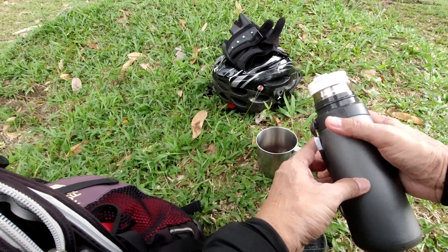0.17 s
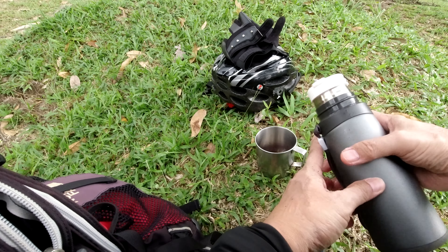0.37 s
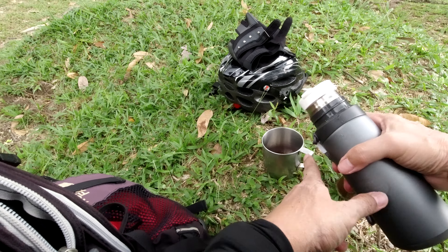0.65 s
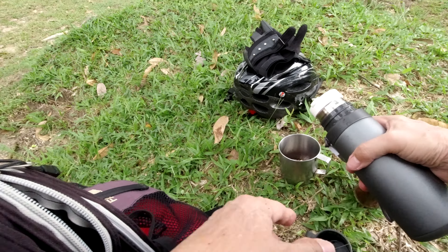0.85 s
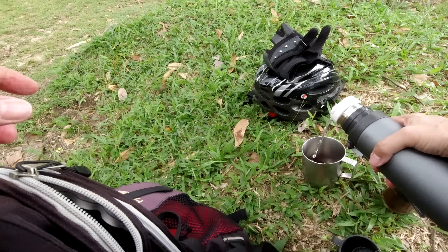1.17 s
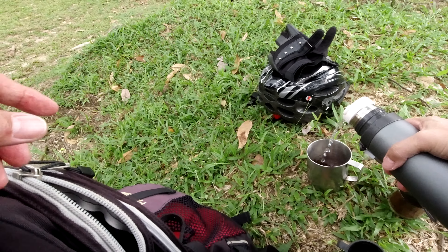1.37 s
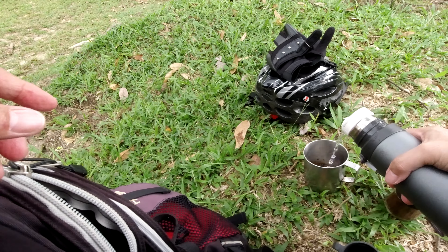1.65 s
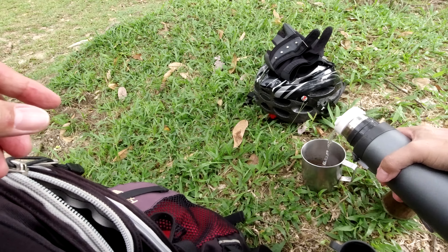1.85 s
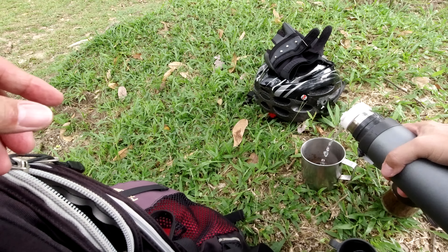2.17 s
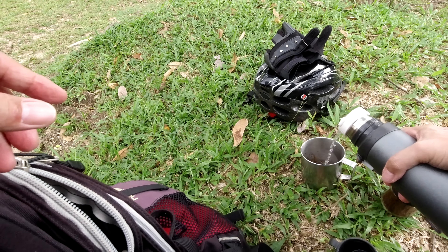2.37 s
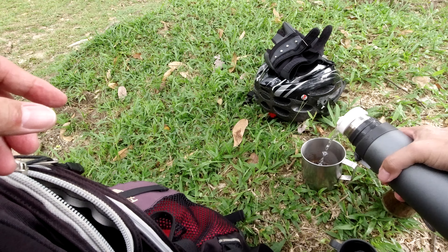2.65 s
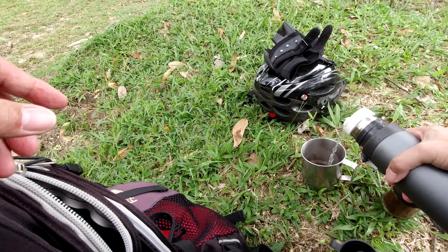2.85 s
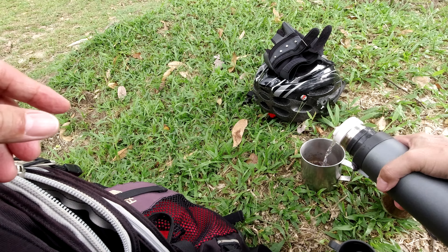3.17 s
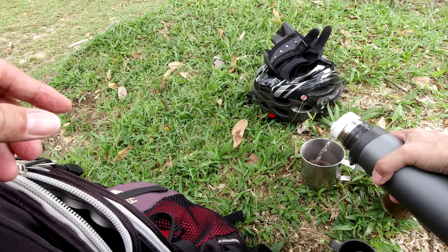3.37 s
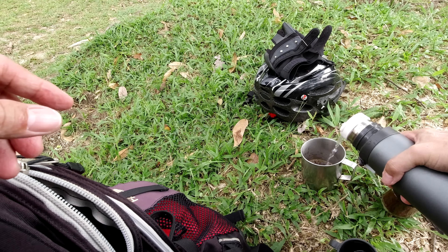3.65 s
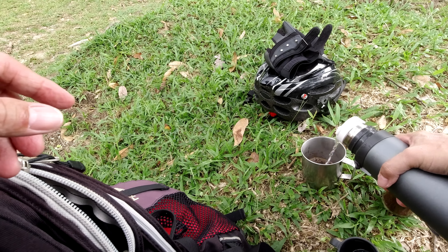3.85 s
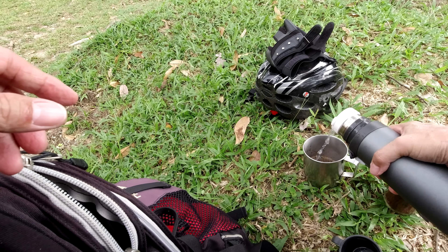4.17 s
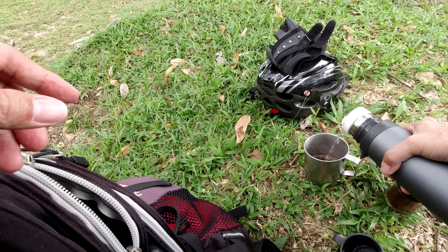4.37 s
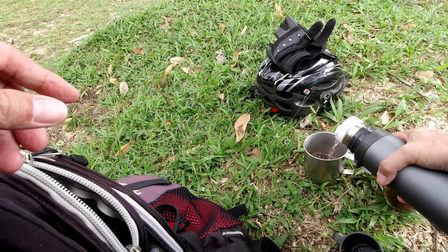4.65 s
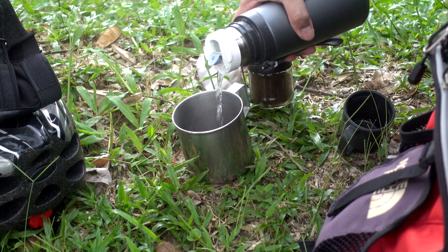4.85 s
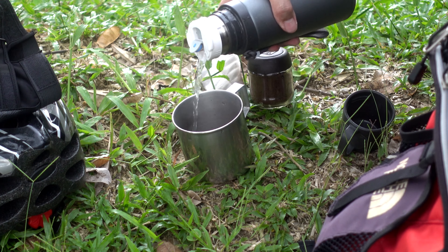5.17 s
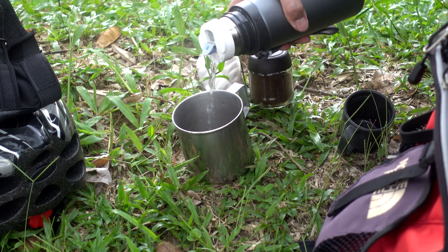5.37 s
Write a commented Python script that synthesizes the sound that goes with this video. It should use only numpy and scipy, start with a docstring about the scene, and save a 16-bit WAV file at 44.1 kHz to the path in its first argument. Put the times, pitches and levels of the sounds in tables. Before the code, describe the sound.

Outdoors amid shrill, constant insects, water pours lightly into a metal mug with bubbly plinks, crisp droplet ticks and brief faint chirps.

```python
"""Insects drone high and steadily all around over soft air; two light ticks and faint far notes come first.
A thin stream of water then runs from a flask into a steel mug standing on grass.
Trapped bubbles plink and gulp as damped rising tones; droplets tick as short rings and noise splats.
Impacts and heavy beads ring the mug's moving resonances, which sway and fall as it fills.
A thin whistle and a hoarse hiss rise as faint chirps; a last hiss sweeps down."""
import sys
import numpy as np
from scipy import signal
from scipy.fft import rfft, irfft
from scipy.io import wavfile

SR = 44100
rng = np.random.default_rng(int(sys.argv[2]) if len(sys.argv) > 2 else 0)


def waveform_to_disk(signal):
    """Save audio, clipped to [-1, 1], as 16-bit WAV at the path in sys.argv[1]."""
    frames = np.transpose(np.atleast_2d(signal))
    scaled = np.clip(frames, -1, 1) * 32767
    samples = np.round(scaled).astype(np.int16)
    wavfile.write(sys.argv[1], SR, samples)


N = 242991
TIME = np.arange(N) / SR

# largest bubbles trapped by the stream: start_s, relative level_db, pitch_hz, cycles to -60 dB
BUBBLE_EVENTS = [(1.4116, -41.5, 2690, 38), (1.6593, -31.0, 2420, 16.0), (1.8682, -49, 1000, 7),
                 (1.9179, -46.5, 1020, 9), (2.1187, -43.5, 1716, 32), (2.3285, -44, 880, 15),
                 (2.6786, -48, 1490, 29.0), (2.7523, -44.5, 1640, 10), (2.8394, -41, 1600, 6),
                 (2.9946, -48, 1350, 15.0), (3.0165, -42.5, 960, 8.5), (3.152, -42.0, 2840, 9),
                 (3.3643, -41, 945, 23), (3.5702, -43, 1482, 28), (3.6438, -38.5, 2790, 25),
                 (3.6873, -48, 1390, 15), (3.7192, -35.5, 860, 14), (3.7992, -42, 875.0, 29.0),
                 (3.8118, -40.5, 2300, 18), (3.8436, -40, 2360, 26), (3.8881, -38, 2590, 15),
                 (3.9451, -46.5, 1280, 18), (3.9631, -36.0, 834, 29.5), (4.0233, -38.5, 2715.0, 35),
                 (4.0249, -46.0, 930, 14), (4.0614, -40, 2685.0, 15), (4.0996, -39.5, 883, 31),
                 (4.1016, -50, 1400, 17.0), (4.2707, -46.5, 905, 18), (4.3032, -37, 891, 17.5),
                 (4.3164, -43, 800, 16.0), (4.3478, -41, 767, 22), (4.4235, -42, 743, 10.5),
                 (4.4799, -41, 870, 9.5), (4.4892, -46, 2285.0, 28), (4.5175, -45.5, 2925.0, 21),
                 (4.5495, -38.5, 1270, 7.5), (4.5611, -45.5, 2850, 45.0), (4.6178, -36.5, 874, 11),
                 (4.6532, -34, 2900, 19), (4.6837, -43, 955.0, 13), (4.8865, -38.5, 2720, 21),
                 (5.0703, -36, 836, 10), (5.1077, -42, 743, 17.5), (5.1531, -46.5, 2820, 43),
                 (5.2269, -40.0, 950, 19), (5.2756, -42.5, 2850, 32.0), (5.2884, -43.5, 2780, 24.0),
                 (5.3405, -43.0, 900, 11.0), (5.4378, -36, 3400, 3), (5.4718, -43, 2800, 20)]
# modes across the mug, set by its bore: pitch_hz, width_hz, relative level_db
BORE_RESONANCES = [(2216, 230, 1.5), (2810, 85, -1)]


def amp(db):
    """Decibels to gain."""
    return 10 ** (np.asarray(db) / 20)


def unit(x):
    """Scales to rms 1."""
    return x / np.sqrt(np.mean(x ** 2) + 1e-20)


def read(points, hz):
    """Reads a spectrum table on a log-frequency axis."""
    f, value = np.transpose(points)
    return np.interp(np.log(hz + 1), np.log(f), value)


def add(mix, s, sound):
    """Mixes a sound in at time s."""
    part = mix[..., round(s * SR):][..., :sound.shape[-1]]
    part += sound[..., :part.shape[-1]]


def high_pass(x, hz, order):
    """Removes the bass below hz."""
    return signal.sosfilt(signal.butter(order, hz, "high", fs=SR, output="sos"), x)


def drift(rate_hz):
    """Smooth random motion of rms 1: noise rolled off above rate_hz."""
    hz = np.fft.rfftfreq(N, 1 / SR)
    return unit(irfft(rfft(rng.standard_normal(N)) / (1 + (hz / rate_hz) ** 2), N))


def resonate(x, hz, width_hz):
    """A resonance of gain 1 whose centre may move: shift to 0 Hz, low-pass, shift back."""
    turn = np.exp(2j * np.pi * np.cumsum(hz * np.ones(N)) / SR)
    r = np.exp(-np.pi * width_hz / SR)
    envelope = signal.lfilter([1 - r], [1, -r], x / turn + 1e-18)
    return 2 * (turn * envelope).real


def ring(hz, t60_s, glide=0., build_cycles=0.36, bend=1):
    """A damped tone of peak-1 envelope, rising by share glide over t60; bend > 1 holds, then drops faster."""
    t = np.arange(int(1.3 * t60_s * SR) + 16) / SR
    shape = (1 - np.exp(-t * hz / build_cycles)) * amp(-60 * (t / t60_s) ** bend)
    return shape / shape.max() * np.sin(2 * np.pi * hz * (t + glide * t ** 2 / (2 * t60_s)))


def walls(x, wet_db, t60_s):
    """Steel walls scatter a sound for a few milliseconds, differently towards each ear."""
    t = np.arange(1024) / SR
    tail = rng.standard_normal((2, len(t))) * amp(-60 * t / t60_s) * (t > .0004)
    tail /= np.linalg.norm(tail, axis=1, keepdims=True)
    return x + amp(wet_db) * signal.oaconvolve(x[None], tail, axes=1)[:, :N]


def diffuse(colour_db):
    """Noise from all around, whose likeness in the two ears depends on frequency."""
    # hz, left-right coherence
    coherence = [(60, 0.9), (130, 1), (290, 0.46), (640, 0.49), (1300, -0.41), (2400, 0.5), (4400, -0.42),
                 (8000, -0.17), (15000, 0.25)]
    same = np.clip(read(coherence, np.fft.rfftfreq(N, 1 / SR)), -1, 1)
    left, other = rfft(rng.standard_normal((2, N)))
    right = same * left + np.sqrt(1 - same ** 2) * other
    return unit(irfft(np.array([left, right]) * amp(colour_db), N))


def soft_air():
    """Outdoor air: diffuse coloured noise with slight slow swells."""
    # hz, relative density_db (per Hz)
    air_spectrum = [(20, -37), (45, -25), (80, -16.5), (150, -15), (300, -6), (590, -3), (665, 7.5),
                    (760, 0.5), (1100, 3), (1380, 6), (1620, 4.5), (2150, 8), (3200, 3), (4100, 1.5),
                    (5100, 9), (5900, 1), (9400, -3.5), (16000, 3)]
    noise = diffuse(read(air_spectrum, np.fft.rfftfreq(N, 1 / SR)))
    return amp(-55.0) * noise * amp(.5 * drift(rate_hz=9.6))


def shimmer(depth_db):
    """The quick flicker of many insects buzzing out of step."""
    return amp(depth_db * unit(high_pass(drift(rate_hz=140), hz=4.3, order=2)))


def insects():
    """Two far choruses, split at 9.4 kHz: steady diffuse noise bands, each with its own shimmer."""
    # insect drone: hz, relative density_db (per Hz)
    drone_spectrum = [(5500, -67), (6450, -20), (7100, -8), (7820, 1.5), (8450, -4.5), (8850, -25),
                      (9500, -29.5), (10800, -13.5), (11900, -22), (13300, -19.5), (14150, -10),
                      (14800, -9.5), (15700, -7.5)]
    # narrow bands in the drone: centre_hz, width_hz, rise_db
    shrill_bands = [(7885, 90, 1.2), (13510, 50, 3.5), (14150, 50, 3), (14838, 30, 6), (15200, 50, 2),
                    (15700, 40, 3)]
    hz = np.fft.rfftfreq(N, 1 / SR)
    shrill_db = sum(db * np.exp(-((hz - f) / width) ** 2) for f, width, db in shrill_bands)
    drone = amp(-43.5) * diffuse(read(drone_spectrum, hz) + shrill_db)
    lower = irfft(rfft(drone) * (hz < 9400), N)
    chorus = lower * shimmer(depth_db=1.6) + (drone - lower) * shimmer(depth_db=1.37)
    # a little stronger on the left: hz, left-right difference in dB
    lean_db = read([(6500, 0.6), (8200, 1.9), (10000, 1.2), (14000, 0.17)], hz)
    return irfft(rfft(chorus) * amp([lean_db / 2, -lean_db / 2]), N)


def stopper():
    """Light ticks, perhaps the flask's stopper as the hand shifts, ring its hard plastic."""
    # start_s, relative level_db
    tick_events = [(0.006, -43), (0.015, -43)]
    # pitch_hz, relative level_db, t60_s
    stopper_modes = [(2570, -12, 0.043), (3270, -1.5, 0.023), (5800, -5, 0.023), (6560, 4.5, 0.0068)]
    hits = np.zeros(N)
    for s, db in tick_events:
        add(hits, s, amp([db]))
    body = sum(amp(db) * signal.oaconvolve(hits, ring(hz, t60_s))[:N] for hz, db, t60_s in stopper_modes)
    return walls(body, wet_db=-10, t60_s=0.012)


def far_calls():
    """Faint, slightly rising notes, perhaps a distant bird, blurred by the way: narrow noise bands."""
    # middle_s, pitch_hz, level_db (rms before fading), length_s, width_hz
    calls = [(0.23, 3160, -64.5, 0.2, 700), (0.323, 2213, -64, 0.15, 100), (0.74, 3100, -68, 0.1, 398),
             (1.126, 2250, -65.5, 0.24, 180)]
    rise_hz_per_s = 800
    out = np.zeros(N)
    for s, hz, db, length_s, width_hz in calls:
        pitch_hz = hz + rise_hz_per_s * np.clip(TIME - s, -length_s, length_s)
        band = resonate(rng.standard_normal(N), pitch_hz, width_hz)
        note = unit(resonate(band, pitch_hz, width_hz))
        out += amp(db) * note * np.exp(-(2 * (TIME - s) / length_s) ** 2)
    return out


def stream():
    """The stream's strength, mug and spray gains at every sample."""
    # start_s, strength_db, mug_db (drive that rings the mug), spray_db
    stream_points = [(1.3, -9, -43, 3), (1.82, -6, -2.5, -5), (2.02, -8.5, -4.5, -21),
                     (2.46, -1.5, -9.5, -5), (2.52, -5.5, 9, -4), (2.62, -8, 1, 5), (2.88, 1, -5.5, -2.5),
                     (3.08, 2, -11.5, -5), (3.35, -3, -2.5, -2), (3.53, 3, -18.5, -13), (3.58, 2.5, -4, -6),
                     (3.75, 0, 0.5, -5), (4.05, -1, 2.5, 6.5), (4.4, 1, -2, -12), (4.85, 0.5, -5, -0.5),
                     (5.1, -1.5, 0.5, -10), (5.5, 5, -22, -7.5)]
    s, strength_db, mug_db, spray_db = np.transpose(stream_points)
    strength = amp(np.interp(TIME, s, strength_db)) * (TIME > s[0])
    return strength, amp(np.interp(TIME, s, mug_db)), amp(np.interp(TIME, s, spray_db))


def impacts(per_s, spread_db):
    """Random impulses of either sign with exponentially spread levels, rms 1 in all."""
    size = amp(spread_db * np.minimum(rng.exponential(1, N), 3))
    return unit(size * rng.choice([-1, 1], N) * (rng.random(N) < per_s / SR))


def mug_modes():
    """The mug's two lowest resonances: (Hz at every sample, width Hz, struck dB, trickle dB)."""
    # lower, then upper: width_hz, struck_db, trickle_db
    mode_settings = [(24.3, -1, 1), (43.4, -5, -7.5)]
    # pitches fall as the mug fills and sway as water sloshes: time_s, lower_hz, upper_hz
    mug_pitch = [(1.85, 1166, 1850), (2.15, 1080, 1780), (2.35, 1010, 1516), (2.52, 985, 1550),
                 (2.68, 1085, 1540), (2.8, 1028, 1634), (2.899, 986, 1577), (3.05, 982, 1500),
                 (3.38, 1057, 1430), (3.59, 906, 1555), (3.75, 859, 1440), (3.9, 889, 1384),
                 (4.05, 983, 1430), (4.25, 819, 1376), (4.6, 826, 1266), (4.85, 861, 1533),
                 (5.1, 787, 1363)]
    s, *pitches = np.transpose(mug_pitch)
    return [(np.interp(TIME, s, hz), *mode) for hz, mode in zip(pitches, mode_settings)]


def trickle():
    """The stream breaks into small impacts that ring the mug into a steady, slightly uneven tone."""
    strength, mug_gain, _ = stream()
    drive = strength * impacts(per_s=220, spread_db=3.0) * amp(3.0 * drift(rate_hz=27))
    wobble = 1 + 0.01 * drift(rate_hz=4.5)  # the surface ripples
    mug = sum(amp(db) * unit(resonate(drive * mug_gain, hz * wobble, width_hz))
              for hz, width_hz, _, db in mug_modes())
    bore = sum(amp(db) * unit(resonate(drive, hz, width_hz)) for hz, width_hz, db in BORE_RESONANCES)
    low_pass = signal.butter(4, 3500, fs=SR, output="sos")
    hollow = signal.sosfilt(low_pass, amp(-64) * mug + amp(-69.5) * bore)
    return walls(hollow, wet_db=-9.0, t60_s=0.0085)


def plinks(low_hz, high_hz, per_s, cycles, spread_db, colour=None, count=24):
    """A swarm of short rings at count pitches, each rising as it dies, following the stream's strength."""
    out = np.zeros(N)
    for hz in np.geomspace(low_hz, high_hz, count):
        gain = amp(read(colour, hz)) if colour else 1
        out += gain * signal.oaconvolve(impacts(per_s, spread_db), ring(hz, cycles / hz, glide=0.2))[:N]
    clumps = amp(6.8 * drift(rate_hz=22))  # the stream lands in beads
    return unit(out * clumps * stream()[0])


def fizz():
    """Small bubbles overlap around the foot of the stream; larger ones gurgle when it plunges deep."""
    strength, mug_gain, _ = stream()
    small = plinks(1914, 3200, per_s=28, cycles=42, spread_db=6.5)
    middling = unit(plinks(1227, 1684, per_s=35, cycles=41, spread_db=-0.5, count=8) * mug_gain)
    large = plinks(870, 950, per_s=10, cycles=26, spread_db=2.5, count=6)
    large = unit(large * strength * np.sqrt(mug_gain))
    mix = amp(-68.5) * small + amp(-71.5) * middling + amp(-68.5) * large
    return walls(mix, wet_db=-5, t60_s=0.019)


def chirp(rows, width_hz):
    """A band of noise that slides along a pitch curve; the narrower, the purer."""
    s, hz, db = np.transpose(rows)
    pitch_hz = np.interp(TIME, s, hz)
    band = resonate(rng.standard_normal((2, N)), pitch_hz, width_hz)
    band = resonate(band, pitch_hz, width_hz)
    level = amp(np.interp(TIME, s, db)) * (TIME > s[0]) * (TIME < s[-1])
    return unit(band + 0.036 * band[::-1]) * level  # the ears share very little


def whistle(rows, flutter_db, waver):
    """A thin, nearly pure sine that flutters in level and pitch as it slides along a curve."""
    s, hz, db = np.transpose(rows)
    turns = np.cumsum(np.interp(TIME, s, hz) * (1 + waver * drift(rate_hz=66.5))) / SR
    level = amp(np.interp(TIME, s, db) + flutter_db * drift(rate_hz=32))
    level = level * (TIME > s[0]) * (TIME < s[-1])
    return np.sqrt(2) * level * np.sin(2 * np.pi * turns)


def thin_chirp():
    """A thin rising whistle, heard directly and, as narrow noise, scattered by the surroundings."""
    # time_s, pitch_hz, relative level_db
    thin_curve = [(1.31, 2590, -70), (1.355, 2696, -58.5), (1.5, 2950, -59.5), (1.6, 3080, -55),
                  (1.71, 3174, -54.5), (1.81, 3207, -62), (1.87, 3290, -72), (2.0, 3270, -86)]
    direct = whistle(thin_curve, flutter_db=2.5, waver=0.016)
    return amp(-5.5) * direct + amp(-3.0) * chirp(thin_curve, width_hz=99)


def bubbles():
    """Each large bubble swells, rises in pitch on its way to the surface and is cut short there."""
    glide, build_cycles, bend = 0.1, 2.9, 2.2
    out = np.zeros(N)
    for s, db, hz, cycles in BUBBLE_EVENTS:
        add(out, s, amp(db) * ring(hz, cycles / hz, glide, build_cycles, bend))
    return amp(-1.0) * out


def pinches():
    """The neck of each large bubble snaps shut with a tick and stirs the mug."""
    snaps = np.zeros(N)
    for s, db, hz, _ in BUBBLE_EVENTS:
        add(snaps, s, amp(db) * ring(1.24 * hz, t60_s=0.0016))
    mug = sum(resonate(snaps, hz, width_hz) for hz, width_hz, _, _ in mug_modes())
    bore = sum(amp(db) * resonate(snaps, hz, width_hz) for hz, width_hz, db in BORE_RESONANCES)
    return amp(-8.5) * snaps + amp(-7.0) * mug + amp(5.0) * bore


def droplets():
    """Drops slap water or steel with a short soft splat over a fine random spray; walls smear both."""
    # sharpest drops: start_s, relative level_db, centre_hz
    drop_events = [(1.446, -38.5, 5740), (1.606, -41, 7800), (1.793, -39, 5650), (2.0132, -34, 9800),
                   (2.1192, -33.5, 10400), (2.2451, -30, 7200), (2.311, -23.5, 7800), (2.3415, -29, 6900),
                   (2.3915, -27, 7650), (2.6684, -23, 9300), (2.75, -33, 8300), (2.819, -30.5, 8200),
                   (2.867, -29.5, 7100), (2.9613, -29, 7400), (3.0583, -37, 10500), (3.1617, -31.5, 7600),
                   (3.342, -30.5, 8050), (3.478, -28.5, 8100), (3.501, -27.5, 7340), (3.543, -29, 8700),
                   (3.589, -29, 8160), (3.7029, -41, 5700), (3.764, -33, 8800), (3.7988, -24.5, 7340),
                   (3.832, -28.5, 9250), (3.9209, -32, 8600), (3.9446, -27.5, 9300), (3.9797, -38, 5800),
                   (3.994, -36.5, 5700), (4.003, -38, 10700), (4.0421, -38, 10200), (4.0618, -32, 9000),
                   (4.0895, -40, 6300), (4.1189, -23.5, 9600), (4.1613, -30.5, 8000), (4.2097, -29, 8050),
                   (4.3856, -31.5, 7600), (4.7, -29, 8550), (4.7196, -36.5, 6000), (4.763, -31.5, 9800),
                   (4.8233, -38, 9900), (4.887, -33, 7000), (4.9415, -25.5, 8040), (4.9973, -33, 7750),
                   (5.142, -36, 7840), (5.278, -31.5, 7900)]
    # fine spray: hz, relative level_db
    spray_spectrum = [(4500, -12), (5600, -4), (7500, 7.5), (9500, 1), (11000, 7), (13000, -23)]
    tick_t60_s, slap_t60_s = 0.0028, 0.0055
    ticks, slaps = np.zeros(N), np.zeros(N)
    t = np.arange(512) / SR
    for s, db, hz in drop_events:
        add(ticks, s, amp(db) * ring(hz, tick_t60_s, build_cycles=1.5))
        add(slaps, s, amp(db - 60 * t / slap_t60_s) * (1 - np.exp(-t * hz / 2)))
    spray = plinks(5400, 11500, per_s=45, cycles=16, spread_db=4.0, colour=spray_spectrum, count=8)
    spray = unit(spray * stream()[2])
    splats = amp(-2.0) * ticks + amp(-6.0) * slaps * rng.standard_normal(N) + amp(-62) * spray
    band_pass = signal.butter(3, [5100, 12000], "band", fs=SR, output="sos")
    return walls(signal.sosfilt(band_pass, splats), wet_db=-3.0, t60_s=0.019)


def struck(hits, hz, width_hz):
    """A mode that rings as high as each impulse that hits it."""
    return resonate(hits, hz, width_hz) * SR / (2 * np.pi * width_hz)


def beads():
    """A heavy bead rings every mode of the mug at the pitch that the filling has reached."""
    # start_s, relative low_db (low resonances), relative bore_db (bore modes)
    bead_events = [(2.051, -47.5, -46.5), (2.313, -48, -46), (2.343, -46, -38.5), (2.504, -36.5, -45),
                   (2.679, -39.5, -43), (2.752, -38.5, -45), (2.789, -40, -61), (2.839, -35, -54),
                   (2.868, -38.5, -41), (2.9944, -41, -40.5), (3.0185, -46, -42), (3.1006, -63, -40),
                   (3.15, -46, -47), (3.183, -58, -40.5), (3.236, -45, -58), (3.285, -45, -64),
                   (3.334, -43.5, -57), (3.418, -41.5, -53), (3.4775, -44, -41), (3.569, -38.5, -62),
                   (3.589, -42, -41), (3.8, -38, -39), (3.8459, -36.5, -55), (3.921, -60, -38),
                   (3.945, -34.5, -42), (4.1, -46, -40), (4.2095, -46, -49), (4.3035, -62, -46),
                   (4.349, -50, -43), (4.4233, -47, -58), (4.5495, -52, -52), (4.6837, -64, -38.5),
                   (4.764, -43, -39.5), (4.783, -52, -39), (4.893, -34, -43), (4.943, -40, -46),
                   (5.194, -58, -52), (5.2765, -61, -35), (5.315, -56, -40), (5.341, -53, -40)]
    low_hits, bore_hits = np.zeros(N), np.zeros(N)
    for s, low_db, bore_db in bead_events:
        add(low_hits, s, amp([low_db]))
        add(bore_hits, s, amp([bore_db]))
    mug = sum(amp(db) * struck(low_hits, hz, width_hz) for hz, width_hz, db, _ in mug_modes())
    bore = sum(amp(db) * struck(bore_hits, hz, width_hz) for hz, width_hz, db in BORE_RESONANCES)
    return amp(-5.5) * mug + amp(-6.5) * bore


def hoarse_chirp():
    """A hiss whose noise bands rise together."""
    # time_s, centre_hz, relative level_db
    hoarse_curve = [(2.62, 3650, -68), (2.72, 3800, -54), (2.77, 4050, -52.5), (2.86, 4640, -49),
                    (2.91, 4820, -54), (2.99, 5000, -54.5)]
    # multiple of the centre, width_hz, relative level_db
    hiss_bands = [(0.9, 760, -9), (1, 400, -6), (1.22, 1100, -9.5), (1.1, 7600, -7)]
    out = 0
    for ratio, width_hz, db in hiss_bands:
        rows = [(s, hz * ratio, level_db) for s, hz, level_db in hoarse_curve]
        out = out + amp(db) * chirp(rows, width_hz)
    return out


def swish():
    """A broad hiss whose centre sweeps down."""
    # time_s, centre_hz, level_db
    swish_curve = [(3.44, 5900, -84), (3.52, 5400, -57), (3.59, 4500, -52.5), (3.68, 3620, -61)]
    return chirp(swish_curve, width_hz=4500)


def scene():
    """The pour in the middle, the meadow around it."""
    meadow = soft_air() + insects() + far_calls()
    plops = walls(bubbles(), wet_db=-16, t60_s=0.04)
    rings = walls(pinches() + beads(), wet_db=-17, t60_s=0.04)
    # the small mouth of the mug radiates no bass
    water = plops + high_pass(rings + trickle() + fizz(), hz=769, order=6)
    treble = high_pass(droplets() + thin_chirp() + hoarse_chirp() + swish(), hz=1100, order=2)
    return meadow + stopper() + water + treble


def record(dry):
    """Cuts the lowest bass and limits the band at the top."""
    thin = high_pass(dry, hz=44.4, order=2)
    edge_hz = 15800
    low_pass = signal.firwin(601, edge_hz, window=("kaiser", 8), fs=SR)
    return signal.oaconvolve(thin, low_pass[None], "same")


dry = scene()
out = record(dry)
waveform_to_disk(out)
```